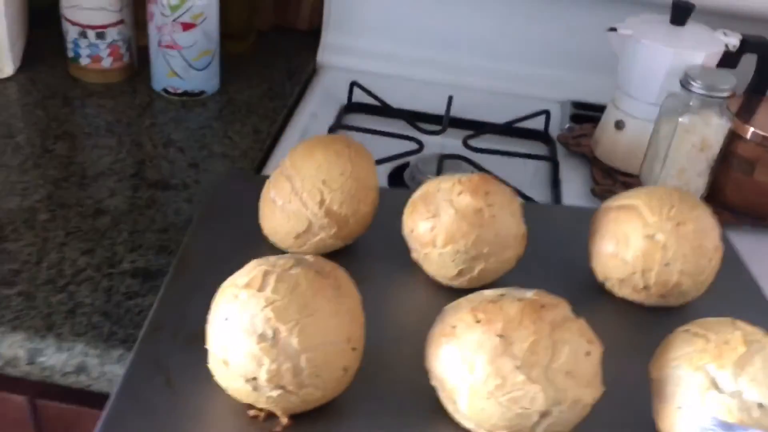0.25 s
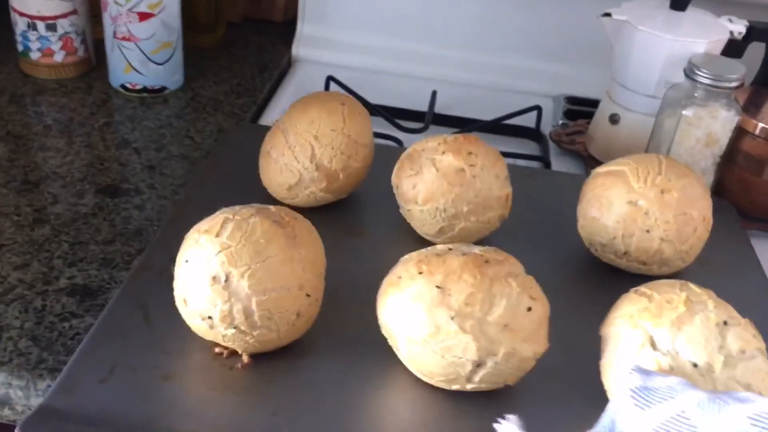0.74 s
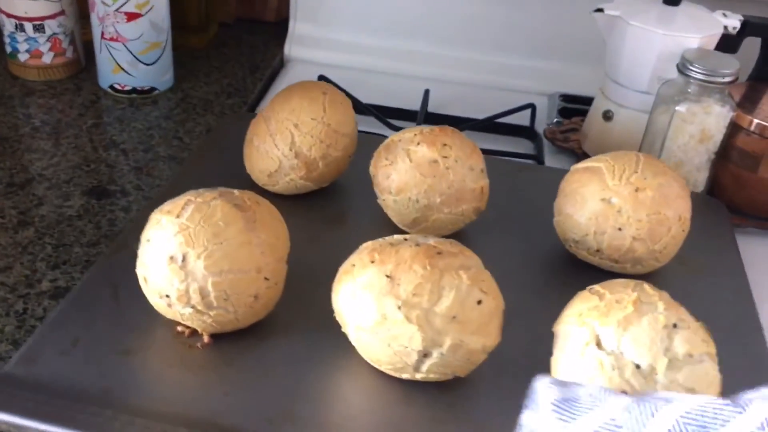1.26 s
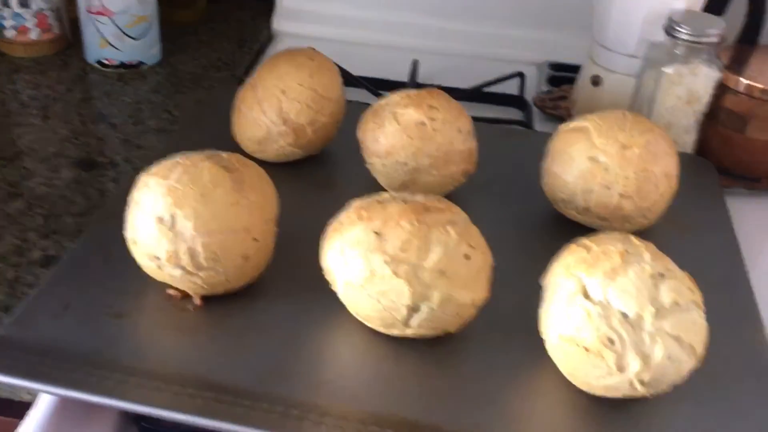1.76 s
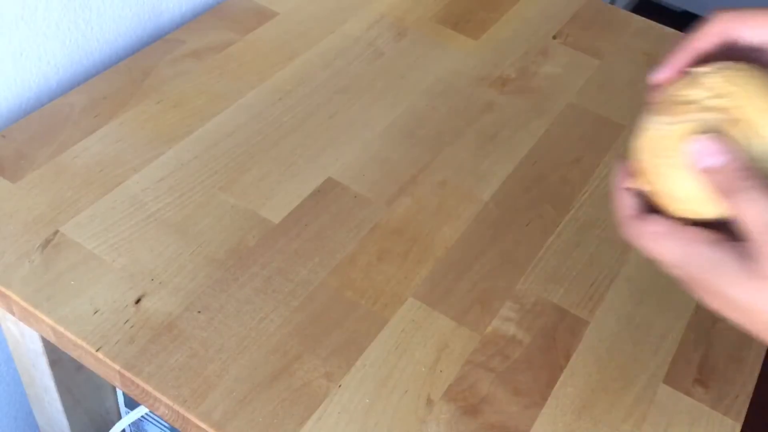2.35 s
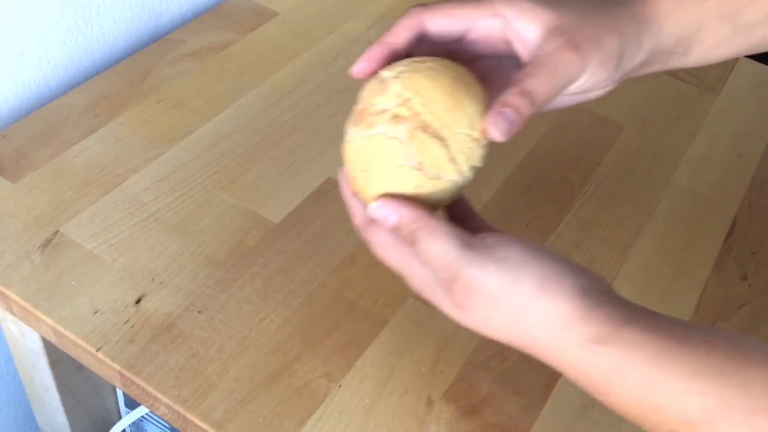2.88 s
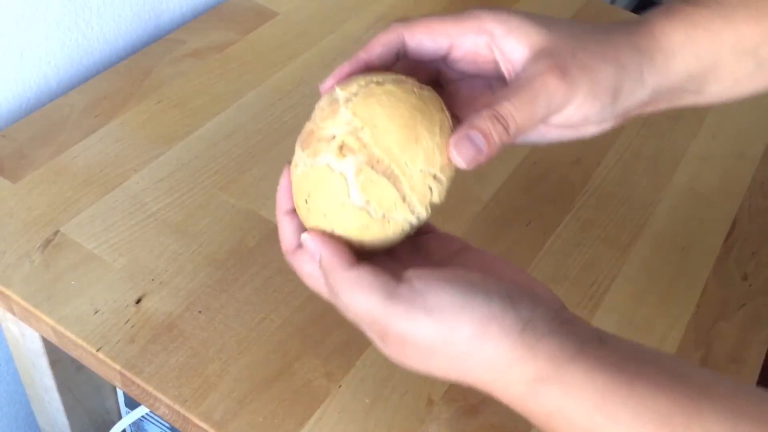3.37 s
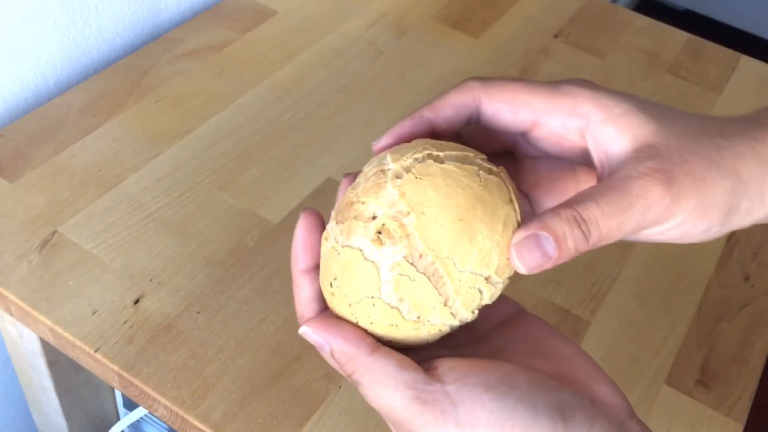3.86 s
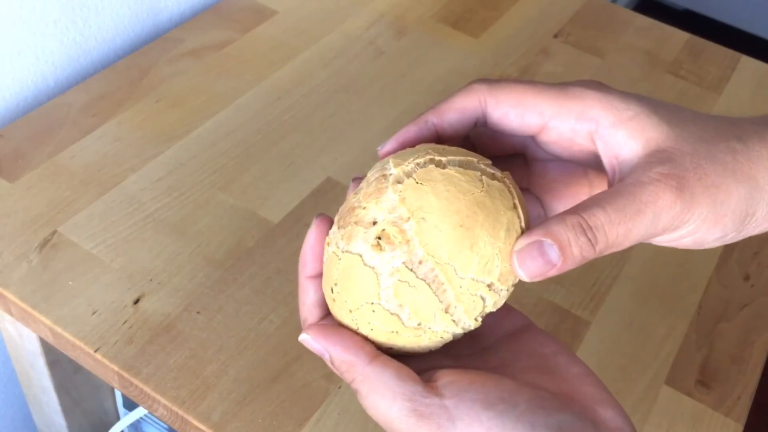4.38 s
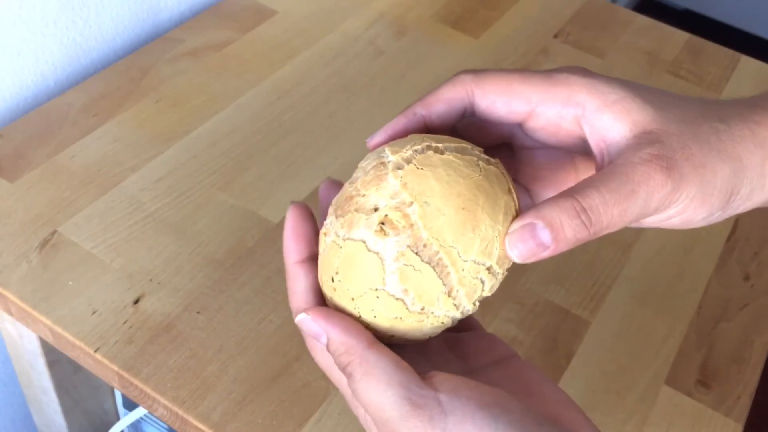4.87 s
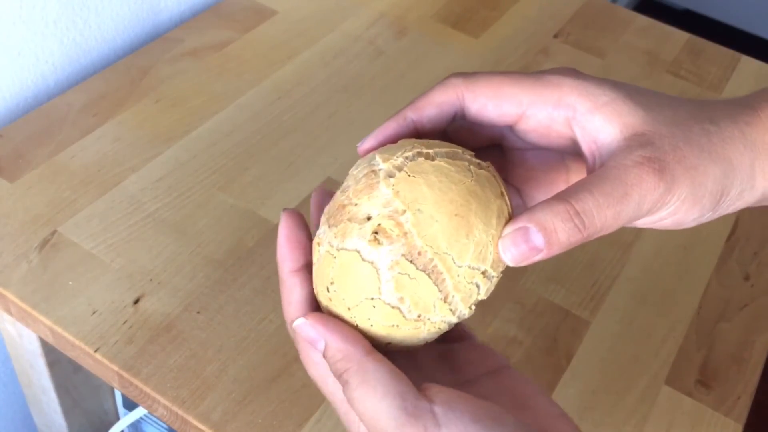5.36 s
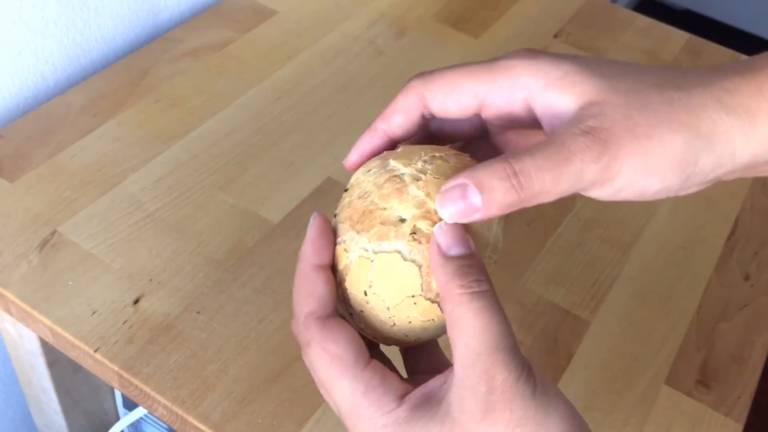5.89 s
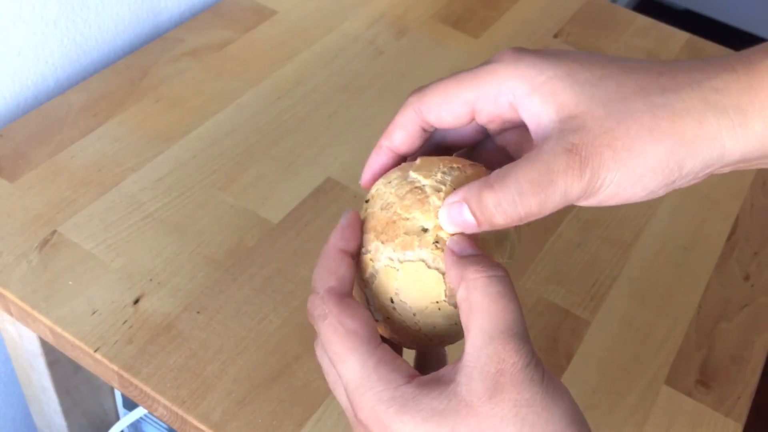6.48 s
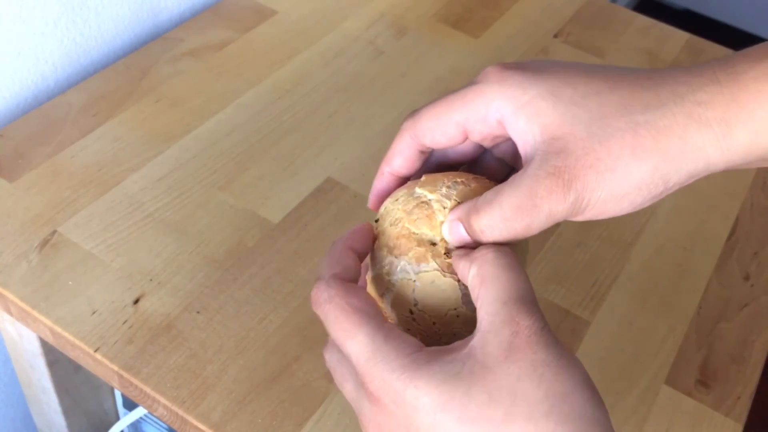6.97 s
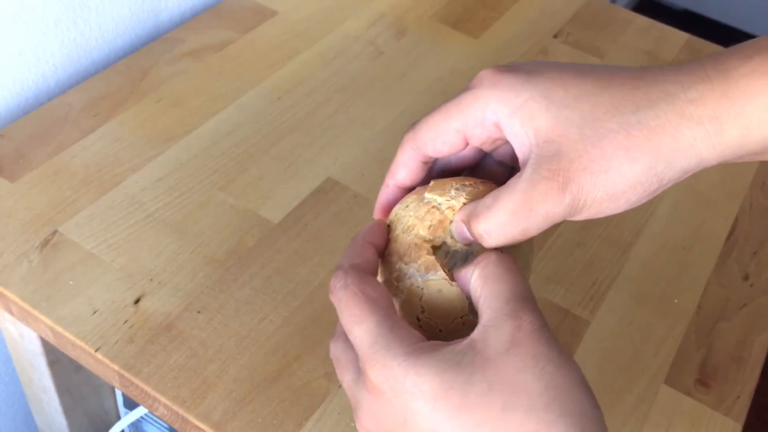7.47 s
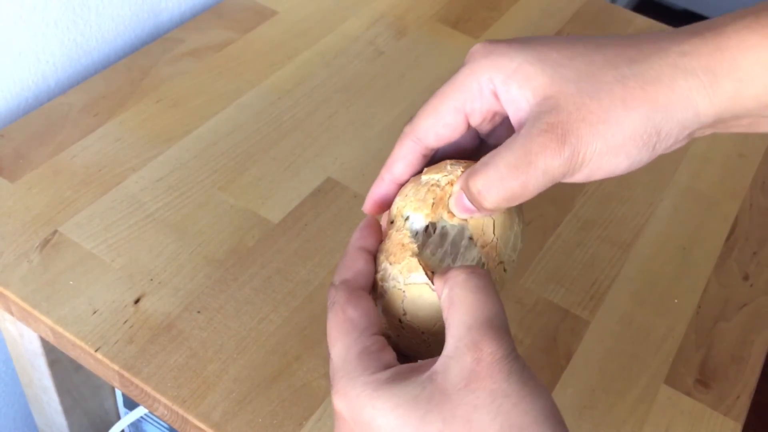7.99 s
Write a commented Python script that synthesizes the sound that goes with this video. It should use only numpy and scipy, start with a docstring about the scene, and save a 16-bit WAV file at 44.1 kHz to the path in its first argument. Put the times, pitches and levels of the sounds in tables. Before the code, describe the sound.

A low, slightly wavering appliance hum and deep rumble run throughout in a small kitchen, stronger after about 1.5 s. Immediately a metal baking tray hits the counter: several loud, hard clangs within 0.15 s, with a buzzing sheet rattle and short room reverberation. It slides softly, knocks again more weakly from 0.37 to 0.5 s, and gives a last light tap near 0.83 s. Faint towel brushing follows until about 1.6 s. From 2 to 3 s there are tiny dull finger ticks and soft palm rubbing on a crust, then near quiet, with a small tick at 4.5 s and a faint rub around 4.9 s. At 6 s the close, dry crust breaks: a very sharp snap at 6.12 s, another at 6.18 s, amid bright crackles. Another burst comes near 6.74 s; around 7.1-7.3 s crunching turns duller with tearing crumb, then sparse crackles continue to the end, about 8.2 s.

```python
"""Over an appliance's hum and rumble in a small room, a metal baking tray is knocked down on a kitchen counter,
rocks and slides to rest; a towel brushes it. Hands turn a crisp bun, then press the thumbs in: the crust
snaps and crackles and the crumb tears. Tray: noise bursts and ringing modes; crust: filtered flurries of breaks;
crackle: chance impulses through resonators; brushing, rumble and air: coloured noise; hum: a wavering sine.
The bun is close and nearly dry, the tray wakes the room."""
import sys
import numpy as np
from scipy import signal
from scipy.fft import rfft, irfft
from scipy.io import wavfile

SR = 44100
rng = np.random.default_rng(int(sys.argv[2]) if len(sys.argv) > 2 else 0)


def wav_record(signal):
    """Record a signal, one row per channel, as 16-bit PCM in the file named by sys.argv[1]."""
    frames = np.transpose(np.atleast_2d(signal))
    bounded = np.clip(frames, -1, 1)
    # unit amplitude maps onto the largest positive 16-bit level
    quanta = np.round(bounded * 32767).astype(np.int16)
    wavfile.write(sys.argv[1], SR, quanta)


N = 362943
TIME = np.arange(N) / SR
GRIP_FROM_S = 5.85  # the hands hold the bun firmly from here on

# how far the cracks reach into the softer inside: t/s, dulling level/dB per octave
DULLING = [(6.05, -2.3), (6.95, 0.5), (7.07, 5.5), (7.3, 0.5), (7.5, -2)]


def from_db(db):
    """Decibels to gain."""
    return 10 ** (np.asarray(db) / 20)


def rms_one(x):
    """Scale to unit power."""
    return x / np.sqrt(np.mean(x ** 2) + 1e-20)


def energy_one(x):
    """Scale to unit energy."""
    return x / np.sqrt(np.sum(x ** 2) + 1e-20)


def level(rows, axis=1):
    """Gain in time from a dB column of a curve, nearly silent (-120 dB) outside it."""
    columns = np.transpose(rows)
    return from_db(np.interp(TIME, columns[0], columns[axis], left=-120, right=-120))


def at_hz(points, hz):
    """Read a table on a log-frequency axis."""
    f, value = np.transpose(points)
    return np.interp(np.log(hz + 1), np.log(f), value)


def response(spectrum, size):
    """Causal (minimum-phase) impulse response with the given gains."""
    hz = np.arange(size // 2 + 1) * SR / size
    cepstrum = irfft(np.log(from_db(at_hz(spectrum, hz))))
    # folding the cepstrum forward in time makes the response causal
    cepstrum[1:size // 2] *= 2
    cepstrum[size // 2 + 1:] = 0
    return irfft(np.exp(rfft(cepstrum)))


def shape(x, spectrum):
    """Filter by the gains of a spectrum."""
    return signal.fftconvolve(x, response(spectrum, size=2048))[:len(x)]


def colour(x, spectrum):
    """Filter so that white noise keeps its power."""
    return signal.fftconvolve(x, energy_one(response(spectrum, size=8192)))[:len(x)]


def drift(rate):
    """Smooth chance of unit power that takes `rate` new values a second."""
    return rms_one(np.interp(TIME * rate, np.arange(4096), rng.standard_normal(4096)))


def dying(t, t60):
    """Exponential decay by 60 dB in t60 seconds."""
    return from_db(-60 * t / max(t60, 1e-4))


def burst(t60, size):
    """A dying flurry of tiny impacts with unit energy."""
    return energy_one(rng.standard_normal(size) * dying(TIME[:size], t60))


def add(out, s, sound):
    """Mix a sound in at time s."""
    at = max(round(s * SR), 0)
    out[at:at + len(sound)] += sound[:max(N - at, 0)]


def gestures(rows, attack_s, release_s):
    """Each movement swells, holds and dies away; overlapping ones add in power."""
    power = 0
    for s, hold_s, db in rows:
        before = np.maximum(s - TIME, 0) / attack_s
        after = np.maximum(TIME - s - hold_s, 0) / release_s
        swell = from_db(db) * np.exp(-np.minimum(before + after, 20))
        power = power + swell ** 2
    return np.sqrt(power)


def background(air_db=-56.5, hum_hz=119.9):
    """Mains hum that wavers in the room, a low rumble and moving air."""
    # the appliance: t/s, rumble level/dB, hum level/dB before its waver
    appliance_curve = [(0, -40.5, -45), (.6, -48.5, -51), (1.47, -50, -50.5), (1.56, -42.5, -46),
                       (4, -42, -46), (8.23, -43.5, -44.5)]
    # colour of the rumble: f/Hz, relative level/dB
    rumble_gain = [(20, -27.5), (29, -17.5), (38, 2), (55, -1.5), (72, 3.5), (100, 0.5), (130, -0.5),
                   (165, -6.5), (200, -17), (300, -37.5), (600, -70)]
    # colour of the air in the room: f/Hz, relative level/dB
    air_gain = [(120, -40), (200, -7), (373, -4.5), (409, -13), (491, -17.5), (612, -12.5), (671, -16),
                (867, -15), (1160, -16.5), (1270, -14), (1710, -21), (2170, -22.5), (2910, -29.5),
                (4270, -34), (16000, -47.5)]
    waver = from_db(drift(3))
    wander = .3 * drift(3)  # phase, radians
    tone = rms_one(np.sin(2 * np.pi * hum_hz * TIME + wander))
    hum = level(appliance_curve, axis=2) * waver * tone
    rumble = level(appliance_curve) * colour(rng.standard_normal(N), rumble_gain)
    air = from_db(air_db) * colour(rng.standard_normal(N), air_gain)
    return hum + rumble + air


def friction(rub_db=0, rough_db=1.5):
    """Sliding surfaces hiss unevenly: noise that follows the strokes and roughens quickly."""
    # a noise already fading as the scene opens, then the tray slides and towel and palms brush by: t/s, hold
    # t/s, friction level/dB before roughness
    strokes = [(0, 0.015, -34), (.2, 0.3, -55.5), (.64, 0.022, -58.5), (.78, .04, -54.5),
               (.95, 0.13, -63.5), (1.57, 0.069, -59.5), (2.4, 0.077, -68.5), (2.8, 0.27, -64.5),
               (4.87, .04, -63.5), (5.2, .01, -69)]
    # colour of the rubbing: f/Hz, relative level/dB
    rub_gain = [(300, -21), (900, 3.5), (2200, 2.5), (3200, -4.5), (6500, -10), (9500, -12), (10400, -21.5),
                (11500, -14), (16000, -21.5)]
    motion = gestures(strokes, attack_s=0.045, release_s=0.068)
    roughness = from_db(rub_db + rough_db * drift(230))
    return roughness * motion * colour(rng.standard_normal(N), rub_gain)


def tray(contact_share=.22, buzz_db=-1.5, mode_spread_db=5.5, ring_db=-19.5):
    """Each knock is a hard contact, a buzz of crowded sheet modes, the longer ring of the strong ones and a thunk."""
    # tray on the counter: t/s, strength level/dB, extra treble level/dB, buzz t60/s,
    # counter thunk level/dB re strength
    knocks = [(0.0085, 13.5, 2.5, .25, -33), (0.052, 9, -2, 0.21, -24), (0.1161, 18.5, .5, 0.1, -38),
              (0.1252, 22, -4, 0.035, -25.5), (0.14, 10, -5, 0.16, -30), (0.3685, -5, 4, 0.096, -33),
              (0.4343, -2, -7.5, 0.091, -15), (0.478, -8, -18, 0.11, -25), (0.4932, 12, -7, .055, -19),
              (0.505, 0.5, -7, 0.073, -11), (0.832, 0, -2.5, .07, -11)]
    # ringing of the sheet: f/Hz, level/dB before each knock's own spread, t60/s
    sheet_modes = [(299.6, -4, 0.48), (577, -7.5, 0.29), (874, -9.5, 0.44), (1060, -8, 0.13),
                   (1457, 2.5, 0.42), (1628, 2, 0.097), (1770, -7, 0.16), (1910, -0.5, 0.14),
                   (2170, -3, 0.13), (2464, -8.5, .22), (3085, -11.5, 0.12)]
    # colour of the clatter: f/Hz, level/dB
    clang_gain = [(100, -26), (200, -14), (280, 1.5), (450, -6.5), (750, 0.5), (1100, -0.5), (1500, -4.5),
                  (2100, 4.5), (2550, -5.5), (3400, -13.5), (6500, -15), (10000, -25), (16000, -36)]
    # extra bass of a knock of strength 0 dB, and the dB of it lost per dB of strength
    light_knock_bass_db, bass_loss_per_db = 5.5, .55
    t, out = TIME[:SR], np.zeros(N)
    modes = np.array([from_db(db) * np.sin(2 * np.pi * hz * t) * dying(t, t60)
                      for hz, db, t60 in sheet_modes])
    # the counter is heavily damped
    thunk = energy_one(np.sin(2 * np.pi * 713 * t) * dying(t, .11))
    for s, strength_db, treble_db, buzz_t60, thunk_db in knocks:
        # a glancing knock stays in contact longer and buzzes longer
        contact = burst(contact_share * buzz_t60, size=SR)
        blow = contact + from_db(buzz_db) * burst(buzz_t60, size=SR)
        # the point of contact decides how strongly each mode answers
        ring = energy_one(from_db(rng.normal(0, mode_spread_db, len(modes))) @ modes)
        # the ring lies well under the clatter
        sheet = shape(blow, clang_gain) + from_db(ring_db) * ring
        # a gentle knock keeps more of its bass, a hard contact has more treble
        bass_db = light_knock_bass_db - bass_loss_per_db * strength_db
        clang = shape(sheet, [(600, bass_db), (1300, 0.0026), (2500, 0.001), (5000, treble_db)])
        add(out, s, from_db(strength_db) * (clang + from_db(thunk_db) * thunk))
    return out


def kitchen(x):
    """Diffuse reflections that build up quickly and die sooner in the treble."""
    # decay of the small room: f/Hz, t60/s
    room_decay = [(200, 0.75), (1500, 0.46), (5000, 0.38), (14000, 0.34)]
    t, tail = TIME[:SR], 0
    edges = np.geomspace(100, 18000, 9)  # Hz
    for low, high in zip(edges, edges[1:]):
        band_filter = signal.butter(2, [low, high], "band", fs=SR, output="sos")
        band = signal.sosfilt(band_filter, rng.standard_normal(SR))
        tail = tail + band * dying(t, at_hz(room_decay, np.sqrt(low * high)))
    build_up = 1 - np.exp(-t / 0.002)
    return signal.fftconvolve(x, energy_one(tail * build_up))[:N]


def snaps(rows, edge, t60, spread_db, top_db, size_dulls, body_dulls, size=2048):
    """A fracture is one sharp edge followed by a brief flurry of tiny breaks of very uneven size."""
    # colour of the crust: f/Hz, level/dB
    crust_gain = [(200, -21), (600, -8), (1250, -2.5), (2100, -3), (2800, -4), (3500, 1), (5000, -3),
                  (7000, -2), (9300, 3), (10500, -1.5), (12500, 2.5), (16000, -4)]
    out = np.zeros(N)
    for s, strength_db, body_db in rows:
        uneven = from_db(spread_db * rng.standard_normal(size))
        crack = energy_one(burst(t60, size=size) * uneven)
        crack[0] = edge
        # larger and deeper breaks carry less treble
        treble_db = top_db - size_dulls * strength_db - body_dulls * max(body_db, 0)
        tilt = [(2300, body_db), (3700, 0), (6200, 0), (9500, treble_db)]
        add(out, s, from_db(strength_db) * shape(energy_one(crack), tilt))
    return shape(out, crust_gain)


def pressure():
    """The hands' effort as a gain: a steady grip, which creaks faintly, with the pushes on top."""
    # the thumbs press in, push by push: t/s, hold t/s, crackle level/dB before grain and clumping
    presses = [(5.99, .06, -66), (6.105, 0.053, -56.5), (6.19, 0.099, -58), (6.32, 0.27, -64),
               (6.73, .06, -57.5), (7.06, 0.019, -66), (7.18, 0.15, -58), (7.44, 0.023, -58),
               (7.54, .16, -66), (7.84, .03, -62.5), (8.06, 0.017, -65), (8.2, 0.024, -65.5)]
    grip = from_db(-72) * (TIME > GRIP_FROM_S)
    return np.hypot(grip, gestures(presses, attack_s=0.034, release_s=.045))


def small_snaps(effort, depth_octaves=1.5, count=200):
    """Chance fractures, more often and stronger under pressure; deeper in the bun they have more body."""
    per_s, base_db, spread_db, body_spread_db = 60, -24.5, 3, 3.5  # rate and strength at full pressure
    when, luck = rng.random((count, 2)).T
    size, body = rng.standard_normal((count, 2)).T
    span_s = TIME[-1] - GRIP_FROM_S
    # one candidate in each equal slot of time
    s = GRIP_FROM_S + span_s * (np.arange(count) + when) / count
    load = np.interp(s, TIME, effort / effort.max())
    strength_db = base_db + 10 * np.log10(load) + spread_db * size
    body_db = depth_octaves * np.interp(s, *np.transpose(DULLING)) + body_spread_db * body
    happens = luck < load * per_s * span_s / count
    return np.transpose([s, strength_db, body_db])[happens]


def crackle(effort, per_s=2000, spread_db=2.0, clump_db=3.0, flake_width=0.65, grain_db=1, tear_db=-6.5, count=12):
    """Tiny flakes break in clumps, more often under pressure, over the soft hiss of tearing crumb."""
    # colour of the crumb: f/Hz, relative level/dB
    crumb_gain = [(300, -30), (800, -0.5), (1400, -0.5), (2100, -1.5), (2800, -4.5), (3600, -5), (5000, -9),
                  (9300, -11), (10500, -11), (13000, -14.5)]
    depth = from_db(np.interp(TIME, *np.transpose(DULLING)))
    born = rng.random(N) < per_s * (effort / effort.max()) ** .3 / SR
    sizes = from_db(spread_db * np.minimum(rng.exponential(1, N), 3)) * rng.choice([-1, 1], N)
    pitches = np.geomspace(1200, 14500, count)  # Hz
    dealt = rng.integers(0, count, N)  # which pitch each flake gets
    grains = 0
    for k, hz in enumerate(pitches):
        # a resonator whose bandwidth is flake_width times its pitch
        r = np.exp(-np.pi * flake_width * hz / SR)
        poles = [1, -2 * r * np.cos(2 * np.pi * hz / SR), r * r]
        flake = signal.lfilter([1, 0, -1], poles, born * sizes * (dealt == k) + 1e-18)
        # deeper in the bun the large, low flakes take over
        grains = grains + (1 - r) * flake * depth ** np.log2(np.median(pitches) / hz)
    grains = grains / np.std(grains[TIME > GRIP_FROM_S]) * from_db(clump_db * drift(68))
    tear = from_db(tear_db) * rng.standard_normal(N)
    return effort * colour(from_db(grain_db) * grains + tear, crumb_gain)


def scene(snap_db=0, tick_db=0, tray_room_db=-7, bun_room_db=-13, tick_room_db=-9):
    """The bun is close and nearly dry; the tray wakes the room."""
    # fingertips tick on the crust as the bun is turned: t/s, strength level/dB, extra body level/dB
    tick_rows = [(2.0149, -23, 13), (2.0995, -27.5, 11.5), (2.3757, -32.5, 11.5), (2.6239, -32.5, 13),
                 (2.7779, -30, 18), (2.8021, -30.5, 13), (2.8437, -31, 7), (3.0402, -30.5, 15),
                 (4.4938, -24, 2), (5.2021, -31, 11.5), (5.5558, -37, 3), (5.8746, -32, 5)]
    # the big fractures of the crust: t/s, strength level/dB, extra body level/dB
    big_snaps = [(5.9838, -20.5, 5), (6.0128, -20.5, 0), (6.0361, -13.5, -5), (6.0871, -17, -3),
                 (6.1087, -15, -4), (6.1191, -0.5, 0), (6.1302, -18, 1), (6.1766, -5.5, -4),
                 (6.1925, -15, -8), (6.2188, -16.5, 4), (6.2607, -15.5, -7), (6.3599, -15.5, -2),
                 (6.5022, -19.5, 5), (6.7395, -11, -13), (6.7568, -16, -5), (6.9884, -24, -12),
                 (7.0486, -31.5, 20.5), (7.108, -25.5, 10), (7.1283, -19, 6), (7.1544, -14, -5),
                 (7.181, -18.5, 15), (7.2835, -15, 6), (7.4465, -22, 8), (7.5191, -21.5, 0),
                 (7.6162, -27, 15.5), (7.703, -23, 11.5), (7.8188, -26, 17.5), (8.0591, -22.5, 9),
                 (8.1563, -23.5, 3), (8.2113, -28, 22)]
    metal, effort = tray(), pressure()
    ticks = from_db(tick_db) * snaps(tick_rows, edge=0.14, t60=0.031, spread_db=6.0,
                                     top_db=0, size_dulls=0, body_dulls=0.51)
    fractures = np.vstack([big_snaps, small_snaps(effort)])
    crust = snaps(fractures, edge=0.74, t60=0.017, spread_db=4, top_db=-10.0, size_dulls=0.22, body_dulls=.3)
    bun = from_db(snap_db) * crust + crackle(effort)
    to_room = from_db(tray_room_db) * metal + from_db(bun_room_db) * bun + from_db(tick_room_db) * ticks
    return (background() + friction() + metal + kitchen(to_room) + ticks + bun)[None]


def record(dry):
    """The microphone signal loses its top steeply above 16 kHz."""
    low_pass = signal.ellip(12, .1, 80, 16000, fs=SR, output="sos")
    return signal.sosfilt(low_pass, dry)


dry = scene()
out = record(dry)
wav_record(out)
```